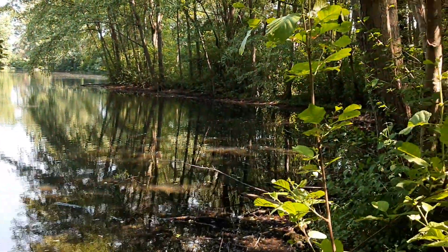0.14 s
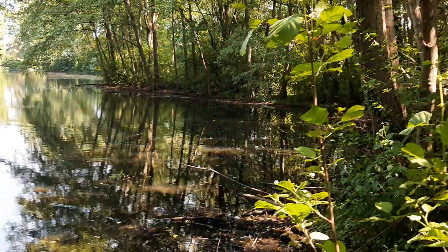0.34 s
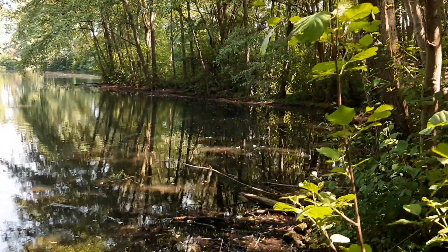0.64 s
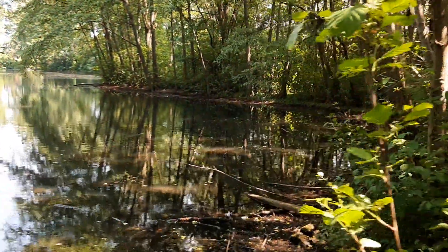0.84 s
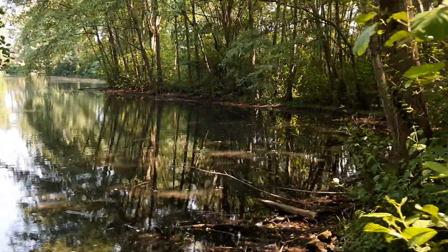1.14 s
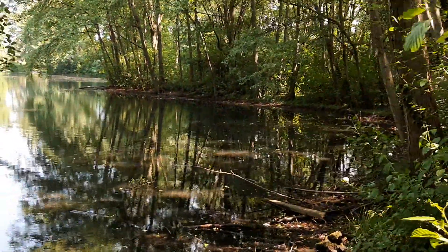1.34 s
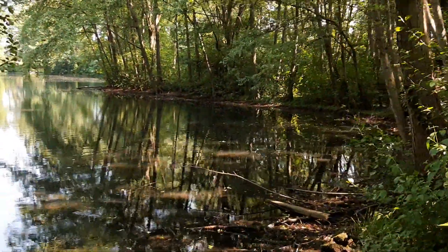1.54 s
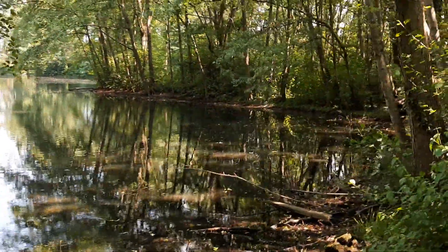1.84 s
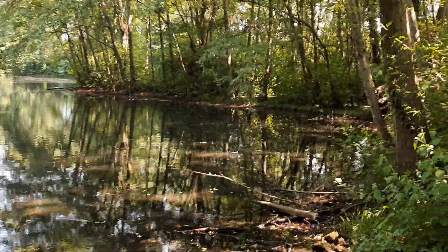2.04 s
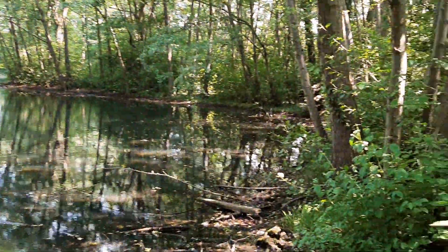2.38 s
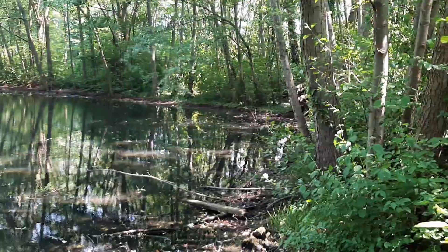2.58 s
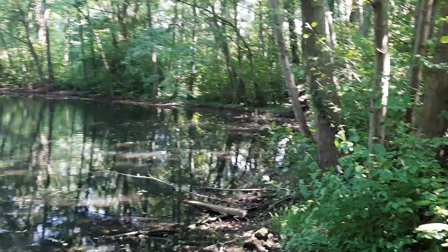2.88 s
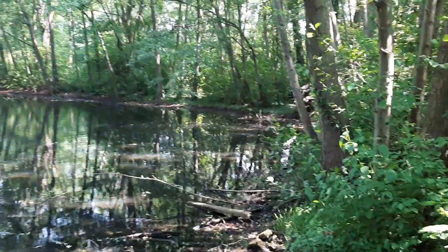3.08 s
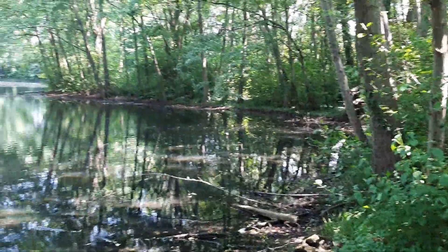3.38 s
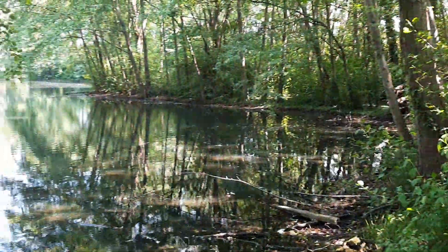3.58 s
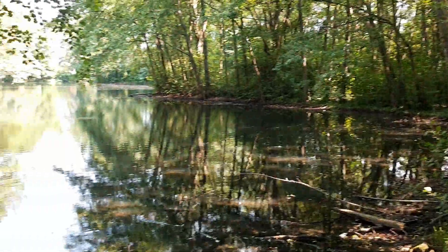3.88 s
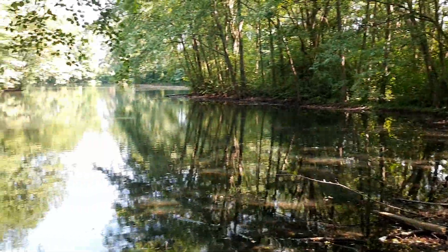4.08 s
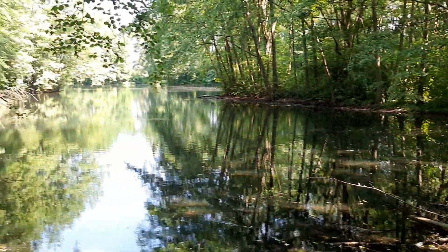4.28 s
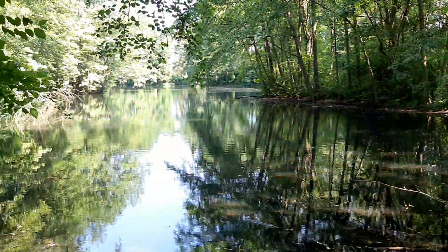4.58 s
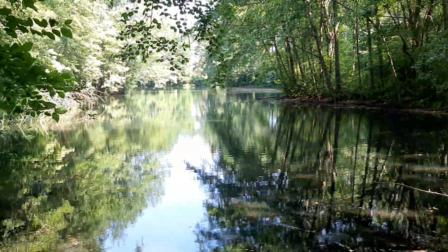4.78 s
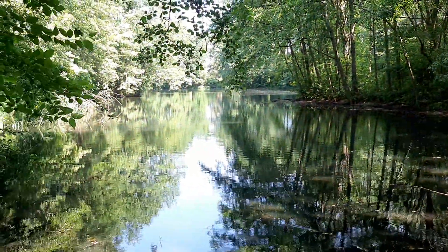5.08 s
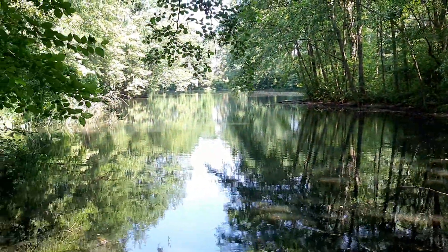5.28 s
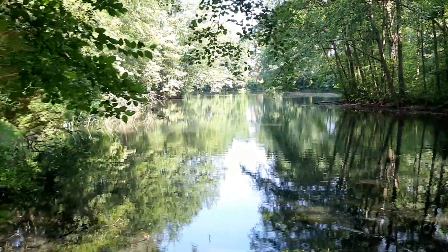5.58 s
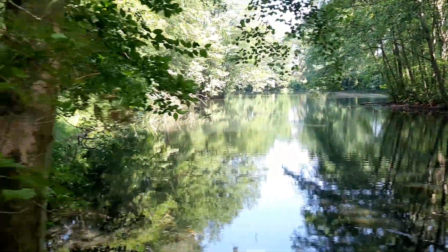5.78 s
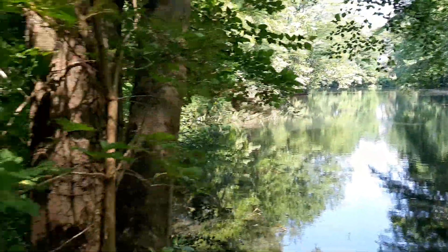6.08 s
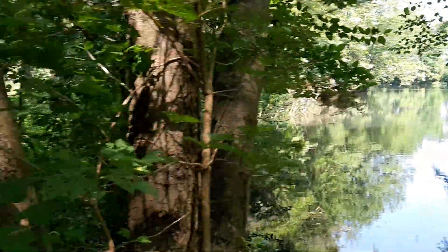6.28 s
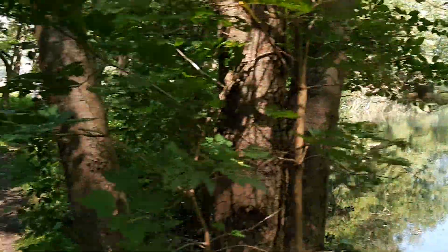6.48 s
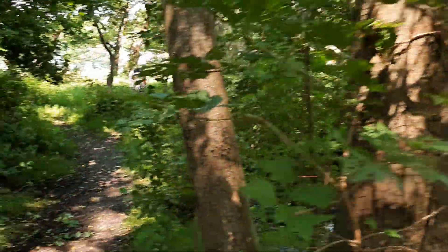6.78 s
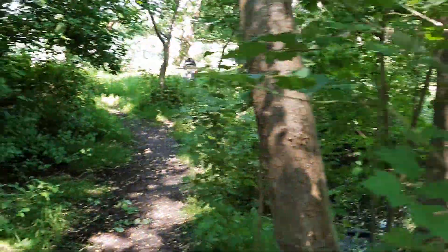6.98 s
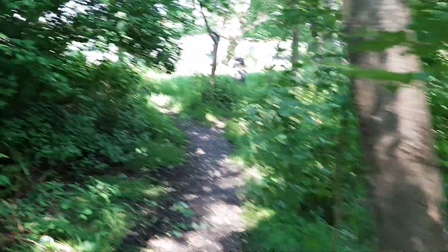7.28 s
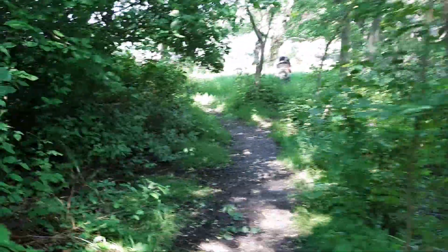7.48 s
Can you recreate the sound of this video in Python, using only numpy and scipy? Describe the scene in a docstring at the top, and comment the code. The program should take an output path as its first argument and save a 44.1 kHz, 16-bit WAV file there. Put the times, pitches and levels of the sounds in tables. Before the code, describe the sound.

A stereo microphone held by someone standing and then moving on a dirt path hears faint songbirds deep in the trees: a quick falling trill, raspy syllables, thin high calls. The birds nearly hush around three seconds, then a close warbler sings loudly and rapidly, its sharp sweeping notes echoing off trunks and water. It stops, leaving sparse calls, dull footfalls, a gritty scuff, soft air hiss and low rumble.

```python
"""A woodland pond: a near warbler bursts into a fast run of loud chirps, each a quick sweep in pitch.
Birds farther off sing, trill, buzz and whistle thinly; the trunks and the water scatter every note into
a tail, and the farthest birds are a blur of noise and random little glides.
Shaped noise makes a low far rumble and a faint leafy hiss. Feet shuffle and scuff on the dirt path
in bursts of grains, with ticking twigs and soft, ringing thuds."""
import sys
import numpy as np
from scipy import signal
from scipy.fft import rfft, irfft, next_fast_len
from scipy.io import wavfile
from scipy.ndimage import map_coordinates

SR = 44100
rng = np.random.default_rng(int(sys.argv[2]) if len(sys.argv) > 2 else 0)


def output_pcm(signal):
    """Save a mono or channel-first signal as 16-bit PCM at the path in sys.argv[1].

    Samples are clipped to [-1, 1] before scaling.
    """
    pcm = np.clip(np.atleast_2d(signal).T, -1, 1) * 32767
    wavfile.write(sys.argv[1], SR, np.round(pcm).astype(np.int16))


N = 336483


def amp(db):
    """Turns decibels into a gain."""
    return 10 ** (np.asarray(db) / 20)


def evened(x):
    """Scales a signal to an rms (average strength) of 1."""
    return x / np.sqrt(np.mean(x ** 2) + 1e-20)


def read(points, hz):
    """Reads a table of (Hz, value) between its rows, on a log-frequency axis."""
    f, value = np.transpose(points)
    return np.interp(np.log(hz + 1), np.log(f + 1), value)


def level(rows):
    """Turns a table of (seconds, dB) into a gain for every sample."""
    return amp(np.interp(np.arange(N) / SR, *np.transpose(rows)))


def add(mix, s, sound):
    """Mixes a sound in at s seconds, cutting off what runs past the end."""
    part = mix[..., max(round(s * SR), 0):][..., :sound.shape[-1]]
    part += sound[..., :part.shape[-1]]


def wander(count, hz):
    """A random curve of rms about 1 that heads for a new value hz times a second."""
    return np.interp(np.arange(count) * hz / SR, np.arange(2048), rng.standard_normal(2048))


def arc(points, count):
    """A smooth curve through evenly spaced points."""
    at = np.linspace(0, len(points) - 1, count)
    return map_coordinates(np.array(points, float), [at], order=2, mode="nearest")


def coloured(x, spectrum):
    """Filters a signal by a table of (Hz, dB), then scales it to rms 1."""
    hz = np.fft.rfftfreq(x.shape[-1], 1 / SR)
    return evened(irfft(rfft(x) * amp(read(spectrum, hz)), x.shape[-1]))


def diffuse(spectrum):
    """Noise from all around, rms 1: alike in both ears in the bass, unrelated in the high treble."""
    # Each row: frequency in Hz, likeness of the two ears (1 = same, 0 = unrelated, below 0 = opposed).
    likeness = [(30, .9), (60, .82), (130, .72), (290, .74), (640, .1), (1400, -.2), (3100, -.03),
                (15000, 0)]
    # Each row: frequency in Hz, left-over-right level in dB.
    balance = [(50, -0.3), (150, 0), (500, 0.2), (1200, -2.5), (4000, 0.3), (12000, 0)]
    size = next_fast_len(N)
    hz = np.fft.rfftfreq(size, 1 / SR)
    a, b = rfft(rng.standard_normal((2, size)))
    same = np.clip(read(likeness, hz), -1, 1)
    side = amp(read(balance, hz) / 2)
    left = a * side
    right = (same * a + np.sqrt(1 - same ** 2) * b) / side
    ears = np.array([left, right])
    return evened(irfft(ears * amp(read(spectrum, hz)), size)[:, :N])


def syrinx(hz, gain, overtone_db=-60, edge_s=.004):
    """A bird's voice box: a nearly pure tone with soft ends and three equal, weaker overtones."""
    t = np.arange(len(hz)) / SR
    phase = 2 * np.pi * np.cumsum(hz) / SR
    ends = np.sin(np.pi / 2 * np.clip(np.minimum(t, t[-1] - t) / edge_s, 0, 1)) ** 2
    # leave out overtones too high for the sample rate
    overtones = sum(np.sin(k * phase) * (k * hz < SR / 2) for k in range(2, 5))
    return np.sqrt(2) * gain * ends * (np.sin(phase) + amp(overtone_db) * overtones)


def trees(x, near_db, near_s, tail_db, gap_s=0.0015, trunks_per_s=900):
    """Near trunks and the water give a quick cluster of echoes; the deeper wood gives a long tail."""
    # Each row: frequency in Hz, time in seconds for the tail to fade by 60 dB.
    wood = [(500, 3.7), (2500, 0.37), (3500, 0.97), (5200, 0.71), (8000, 0.7), (15000, 0.3)]
    t = np.arange(SR) / SR
    # silent for one gap, then faded in over another
    after = np.clip((t - gap_s) / gap_s, 0, 1)
    hits = rng.standard_normal((2, SR)) * (rng.random((2, SR)) < trunks_per_s / SR)
    trunks = hits * after * np.exp(-t / near_s)
    # the tail is noise whose pitches fade at different speeds
    hz, age, z = signal.stft(rng.standard_normal((2, SR)) * after, SR, nperseg=256)
    faded = z * amp(-60 * age / read(wood, hz)[:, None])
    tail = signal.istft(faded, SR, nperseg=256)[1][:, :SR]
    echoes = np.zeros((2, SR))
    for db, part in [(near_db, trunks), (tail_db, tail)]:
        echoes += amp(db) * part / np.linalg.norm(part, axis=1, keepdims=True)
    return signal.fftconvolve(x, echoes, axes=1)[:, :N]


def warbler(lead_s=0.00024, overtones_db=-8, sizzle_db=-4, waver_rate=450):
    """Quick pitch strokes with an airy edge; the bird sits to the left, so that ear hears it first."""
    # The song. Each row: start in seconds, length in seconds, kind of stroke, low Hz, high Hz,
    # level in dB, airy edge in dB against the stroke (before the overtone and sizzle offsets).
    song = [(3.712, 0.069, "slur", 4750, 5550, -36, -25), (3.783, .03, "slur", 4460, 5560, -35, -19.5),
            (3.861, 0.023, "rasp", 3550, 4010, -40.5, -24), (3.885, .018, "rasp", 3334, 3750, -33.5, -27),
            (3.908, .018, "rasp", 3365, 3895, -33.5, -26), (3.947, 0.014, "slur", 4130, 5210, -43.5, -13),
            (3.956, 0.015, "fall", 7070, 7500, -42, -6), (4.051, 0.02, "rasp", 2420, 2950, -46, -19),
            (4.057, 0.018, "fall", 1990, 2860, -47.5, -25),
            (4.127, 0.067, "drop", 4340, 5510, -27.5, -23.5),
            (4.202, 0.031, "slur", 4290, 5600, -28.5, -20.5),
            (4.286, 0.023, "rasp", 3310, 4400, -36.5, -21), (4.312, 0.083, "drop", 1976, 3207, -32.5, -23),
            (4.576, 0.066, "arch", 4200, 5030, -22.5, -27.5), (4.638, 0.055, "fall", 3117, 4670, -28, -23),
            (4.745, .055, "flick", 3612, 4573, -26, -30), (4.797, 0.02, "fall", 3690, 4570, -33, -17.5),
            (4.876, 0.078, "dip", 2233, 3300, -37, -26), (5.005, .033, "flick", 2840, 3930, -34, -43.5),
            (5.032, 0.053, "fall", 3205, 3870, -29.5, -33.5),
            (5.132, 0.029, "flick", 2870, 3980, -31.5, -39.5),
            (5.158, 0.054, "fall", 3196, 3570, -29.5, -35.5), (5.237, 0.1, "arch", 2820, 3217, -30, -37),
            (5.517, 0.041, "slur", 2150, 2866, -34.5, -31), (5.55, 0.094, "arch", 2514, 3086, -29, -36),
            (5.725, 0.023, "flick", 3400, 4150, -28.5, -32), (5.747, 0.023, "fall", 2350, 4350, -36.5, -23),
            (5.767, 0.13, "scoop", 2482, 2792, -31, -27.5)]
    # Kinds of stroke. Each entry: pitch from start to end (0 = low Hz, 1 = high Hz),
    # swell from start to end in dB, waver as a share of the pitch.
    strokes = {"slur": ([0.96, 0.94, .9, 0.567, 0.047], [-7.5, -2.5, 0, -6], .009),
               "drop": ([.97, 0.99, .94, .8, 0.011], [-7, -2.5, -1, -4.5], 0.0078),
               "rasp": ([0, .45, .65, .85, .9], [-11, -2.5, -7, 4], 0.038), "flick": ([0, .15, .18, .32, 1],
               [-15, -2.5, 0, -5.5], .005), "fall": ([0.99, .46, .2, .07, 0.05], [-3.5, -0.5, -4.5, -4.5],
               0.012), "arch": ([0.028, .95, .95, .62, 0.4], [-18, 0.5, -2.5, -0.5], 0.014),
               "dip": ([0.96, .3, 0.041, .06, 0.275], [-1, -2, -5, 3.5], 0.015),
               "scoop": ([0.25, .06, 0.099, .29, 1], [-10, -1.5, -3.5, -1], 0.0048)}
    # Colour of the airy edge. Each row: frequency in Hz, relative level in dB per Hz.
    edge_colour = [(5000, -24), (7100, -13), (9000, -10), (11000, 4), (15800, 13)]
    # Side of the bird, shifting as the listener turns. Each row: time in seconds, left-over-right dB.
    sides = [(3.75, 8), (4.12, 10), (4.33, 4), (4.57, 10), (4.72, 1), (5.1, -1), (5.72, -3.5), (5.77, 8)]
    direct, voice = np.zeros((2, N)), np.zeros(N)
    sizzle = coloured(rng.standard_normal(N), edge_colour)
    for s, length, kind, low_hz, high_hz, db, edge_db in song:
        contour, swell_db, waver = strokes[kind]
        count = int(length * SR)
        hz = low_hz + (high_hz - low_hz) * arc(contour, count)
        hz = hz * (1 + waver * wander(count, waver_rate))
        gain = amp(db + arc(swell_db, count))
        note = syrinx(hz, gain, overtone_db=edge_db + overtones_db, edge_s=.0026)
        breath = signal.windows.tukey(count, .2) * sizzle[int(s * SR):][:count]
        note += amp(edge_db + sizzle_db) * gain * breath
        side_db = np.interp(s, *np.transpose(sides))
        add(voice, s, note)
        add(direct, s, note * evened(amp([[side_db / 2], [-side_db / 2]])))
    # the right ear hears it later
    direct[1] = np.roll(direct[1], round(lead_s * SR))
    return direct + trees(voice[None], near_db=-5, near_s=0.023, tail_db=-10)


def trill(start=.672, period=.0545, length=0.031, top_hz=4450, middle_hz=3550, bottom_hz=3000,
          sweep_db=-55.5, count=9):
    """A finch repeats one falling sweep, never quite alike; each sweep swells as it falls."""
    voice, size = np.zeros(N), int(length * SR)
    for k in range(count):
        hz = arc([top_hz, middle_hz, bottom_hz], size) * (1 + 0.026 * wander(size, 344))
        # each sweep's level differs by chance, about 1 dB
        gain = amp(sweep_db + rng.normal() + np.linspace(-4, 2, size))
        add(voice, start + k * period, syrinx(hz, gain, edge_s=0.0053))
    return voice


def finch(rasp_hz=90, buzz_hz=450, shake_rate=900):
    """A trill, runs of raspy syllables, then buzzes in which the pitch shakes fast and wide."""
    # Syllables, stroke by stroke. Each row: delay in seconds, length in seconds, start Hz, middle Hz,
    # end Hz, level in dB against the run.
    syllables = {"down": [(-.022, .042, 3910, 4300, 4800, -6), (.008, .034, 4360, 3650, 3100, -1),
                 (.036, .038, 2913, 3206, 2200, 0.5)], "up": [(-.008, .058, 2130, 2500, 3900, -4),
                 (.014, .038, 3224, 3320, 3080, 1)]}
    # Runs of one syllable. Each row: kind, first time in seconds, period in seconds, repeats,
    # relative level in dB.
    runs = [("down", 1.213, .181, 3, -48.5), ("up", 1.775, .14, 2, -49)]
    # Closing buzzes. Each row: start in seconds, length in seconds, start Hz, end Hz, relative level in dB.
    buzzes = [(2.239, .14, 3400, 4970, -56.5), (2.373, 0.1, 3875, 2115, -56.5),
              (2.585, 0.174, 2767, 2856, -56.5)]
    voice = trill()
    for kind, first, period, repeats, db in runs:
        for s in first + period * np.arange(round(repeats)):
            for delay, length, *pitches, stroke_db in syllables[kind]:
                count = int(length * SR)
                hz = arc(pitches, count) + rasp_hz * wander(count, shake_rate)
                add(voice, s + delay, syrinx(hz, amp(db + stroke_db), edge_s=0.016))
    for s, length, start_hz, end_hz, db in buzzes:
        count = int(length * SR)
        hz = np.linspace(start_hz, end_hz, count) + buzz_hz * wander(count, shake_rate)
        add(voice, s, syrinx(hz, amp(db), edge_s=0.0038))
    return voice


def far_song(waver_hz=12):
    """Clear, short glides from songbirds deeper in the wood."""
    # Each row: start in seconds, length in seconds, start Hz, end Hz, relative level in dB.
    notes = [(0.049, 0.048, 3940, 3885, -56.5), (0.248, 0.032, 3340, 3510, -54.5),
             (0.339, .045, 3625, 3585, -56.5), (0.399, 0.065, 2800, 2860, -53.5),
             (0.57, 0.023, 4020, 4110, -49.5), (0.619, 0.023, 2830, 2780, -49.5),
             (0.672, 0.12, 3050, 2680, -56.5), (0.943, 0.039, 2440, 2660, -57.5),
             (1.147, .068, 4050, 3650, -55.5), (1.478, 0.029, 3230, 3510, -47.5),
             (1.64, 0.067, 4860, 4710, -62), (2.098, 0.064, 3820, 3940, -55.5),
             (2.15, 0.07, 2790, 2786, -54), (2.322, 0.06, 3480, 3204, -50),
             (2.421, 0.048, 3476, 3335, -53.5), (3.073, 0.044, 3050, 3240, -61.5),
             (3.171, 0.066, 2780, 2920, -64), (3.239, 0.061, 3430, 3336, -63.5),
             (3.47, 0.04, 3190, 3010, -61.5), (3.635, 0.096, 3510, 3770, -56.5),
             (4.09, 0.081, 4200, 4230, -56), (6.122, 0.04, 3030, 2810, -56.5),
             (6.353, 0.098, 3670, 3754, -58), (6.446, .3, 3990, 4760, -73), (6.645, 0.033, 4050, 3850, -62),
             (6.946, .035, 3790, 3370, -62.5), (7.04, 0.112, 3486, 3420, -68)]
    voice = np.zeros(N)
    for s, length, start_hz, end_hz, db in notes:
        count = int(length * SR)
        hz = np.linspace(start_hz, end_hz, count) + waver_hz * wander(count, 305)
        add(voice, s, syrinx(hz, amp(db), edge_s=0.0088))
    return voice


def high_calls(scoop_hz=1100, scoop_s=0.0073, thin_db=-1):
    """Thin two-voiced falling calls in the canopy, and whistles that drop onto a held pitch."""
    # Thin calls. Each row: start in seconds, pitch in Hz, relative level in dB.
    thin_calls = [(0.143, 7700, -67), (0.279, 7480, -64), (1.033, 7280, -70), (1.068, 8400, -67),
                  (1.18, 7750, -65), (2.166, 7970, -67.5), (2.342, 7960, -66.5), (2.759, 6550, -59),
                  (2.917, 6200, -61), (3.28, 7570, -62), (3.461, 7350, -63.5), (6.274, 6950, -64.5),
                  (6.41, 6730, -68), (6.786, 7160, -75), (6.935, 7550, -71)]
    # Plain whistles. Each row: start in seconds, length in seconds, held pitch in Hz, relative level in dB.
    whistles = [(0, 0.034, 5280, -57), (0.674, 0.21, 5485, -53), (2.655, 0.16, 5430, -53.5),
                (5.389, 0.175, 5405, -53)]
    thin_s, fall_share = .083, .12
    # the second voice is lower and weaker: (share of the pitch, dB)
    voices = [(1, 0), (.86, -6)]
    voice = np.zeros(N)
    count = int(thin_s * SR)
    fall = 1 + fall_share * arc([.55, 0, -.45], count)
    for s, pitch_hz, db in thin_calls:
        for ratio, voice_db in voices:
            hz = pitch_hz * ratio * fall + 50 * wander(count, 600)
            add(voice, s, syrinx(hz, amp(db + thin_db + voice_db), edge_s=0.0036))
    for s, length, pitch_hz, db in whistles:
        t = np.arange(int(length * SR)) / SR
        hz = pitch_hz + scoop_hz * np.exp(-t / scoop_s) + 22 * wander(len(t), 124)
        add(voice, s, syrinx(hz, amp(db), edge_s=0.019))
    return voice


def feet(grains_per_s=2500, twig_s=.0012):
    """Each scuff is a swell of tiny grains; twigs tick and heels thud on soft ground."""
    # Shoes on dirt and dry leaves. Each row: start in seconds, length in seconds, level in dB,
    # lift of the bright grit in dB.
    scuffs = [(0.068, 0.12, -64, 7), (1.754, 0.068, -57.5, 2), (1.928, 0.14, -66.5, 15),
              (2.723, .14, -57.5, 3), (6.353, 0.063, -64.5, 0), (7.135, 0.25, -69, 14),
              (7.56, 0.091, -50.5, -3)]
    # Colour of crushed dirt. Each row: frequency in Hz, relative level in dB per Hz.
    dirt = [(100, -27), (600, -8), (1800, 2), (3200, -14), (5000, -11), (7500, -10.5), (12000, -11.5),
            (15800, -24)]
    # Twigs underfoot. Each row: start in seconds, relative level in dB.
    twigs = [(2.773, -38), (2.826, -48)]
    # Soft footfalls. Each row: start in seconds, level in dB, left-over-right dB.
    footfalls = [(1.939, -41.5, -23), (6.809, -28.5, 28.5), (7.069, -37, 4), (7.364, -36, 8)]
    # The ringing of a dull thud. Each row: frequency in Hz, level in dB, seconds to fade by 60 dB.
    thud_tones = [(99.4, 4.5, 0.084), (131, -6.5, 0.059), (188, -10.5, 0.11)]
    out = np.zeros((2, N))
    for s, length, db, grit_db in scuffs:
        shape = (2, int(length * SR))
        grains = rng.standard_normal(shape) * (rng.random(shape) < grains_per_s / SR)
        colour = [(hz, d + grit_db * (hz > 4000)) for hz, d in dirt]
        add(out, s, amp(db) * coloured(grains, colour) * signal.windows.tukey(shape[1], .6))
    t = np.arange(SR // 4) / SR
    for s, db in twigs:
        crackle = coloured(rng.standard_normal((2, len(t))), dirt)
        add(out, s, amp(db) * crackle * np.exp(-t / twig_s) / 2)
    thud = sum(amp(db - 60 * t / t60) * np.cos(2 * np.pi * hz * t) for hz, db, t60 in thud_tones)
    # soft ground: a slow start
    thud = thud * (1 - np.exp(-t / 0.014))
    for s, db, side_db in footfalls:
        add(out, s, thud * amp([[db + side_db / 2], [db - side_db / 2]]))
    return out


def shuffle():
    """A soft low shuffle of the feet: noise that comes and goes."""
    # Each row: frequency in Hz, relative level in dB per Hz.
    shuffle_colour = [(90, -29), (170, -6), (300, 0.5), (420, 0), (700, -25)]
    # Each row: time in seconds, level in dB.
    shuffle_level = [(3.2, -84), (3.9, -68.5), (4.35, -62.5), (4.6, -80), (6.2, -74.5), (7.1, -69.5),
                     (7.63, -61.5)]
    return level(shuffle_level) * diffuse(shuffle_colour)


def twitter(low_hz, high_hz, per_s, glide=0.11, spread_db=4):
    """Many birds too far off to tell apart: short random glides, heard only through the trees."""
    voice = np.zeros(N)
    for when, pitch, span, slope, size in rng.random((int(per_s * N / SR), 5)):
        count = int((0.0308 + .05 * span) * SR)
        middle_hz = low_hz * (high_hz / low_hz) ** pitch
        # more glides fall than rise
        hz = middle_hz * np.exp(glide * (2 * slope - 1.3) * np.linspace(-1, 1, count))
        add(voice, when * N / SR, syrinx(hz, amp(spread_db * 2 * size), edge_s=0.04))
    return evened(trees(voice[None], near_db=6, near_s=0.065, tail_db=-8.5))


def distant_chorus(blur_db=-2, low_twitter_db=-7, high_twitter_db=-8):
    """The farthest birds: a blur of noise with low and high twitter, whose level dips twice."""
    # Colour of the blur. Each row: frequency in Hz, relative level in dB per Hz.
    blur_colour = [(1500, -22), (2300, -26.5), (3200, 1), (4200, -0.5), (5200, 2), (7000, -8.5), (7800, -2),
                   (8600, -39)]
    # Level of the whole chorus. Each row: time in seconds, relative level in dB.
    chorus_level = [(0, -62.5), (.9, -58.5), (1.6, -59.5), (2.8, -62), (3.1, -86), (3.8, -59), (5.8, -59.5),
                    (6.3, -74.5), (7, -62.5), (7.63, -63.5)]
    chorus = amp(blur_db) * diffuse(blur_colour)
    chorus = chorus + amp(low_twitter_db) * twitter(2600, 4500, per_s=29)
    chorus = chorus + amp(high_twitter_db) * twitter(5700, 7500, per_s=26)
    return level(chorus_level) * chorus


def leafy_air(air_db=2):
    """The still air of the wood: a faint hiss that rises and falls as leaves stir."""
    # Each row: frequency in Hz, relative level in dB per Hz.
    air_colour = [(120, -25), (200, -13), (430, -8), (590, -2.5), (790, -5.5), (1000, -2), (1280, -5),
                  (1550, -2), (2270, -7.5), (4500, -16), (7800, -18.5), (9000, -29.5), (10800, -26),
                  (15800, -26)]
    # Each row: time in seconds, level in dB before air_db.
    breeze = [(0, -63), (.8, -60), (3.3, -60.5), (4.3, -58.5), (6.3, -59.5), (7.63, -57.5)]
    return amp(air_db) * level(breeze) * diffuse(air_colour)


def far_rumble(rumble_db=2):
    """Deep noise from far away that swells in the middle and rises again near the end."""
    # Each row: frequency in Hz, relative level in dB per Hz.
    rumble_colour = [(15, -50), (30, -28), (48, 0.5), (62, -2), (73, 3), (88, -6.5), (104, -9.5),
                     (130, -13.5), (200, -21), (300, -27), (500, -51)]
    # Each row: time in seconds, level in dB before rumble_db.
    rumble_level = [(0, -54), (2.8, -56), (3.9, -52), (5.8, -51.5), (6.4, -57), (7.3, -52.5), (7.63, -53)]
    return amp(rumble_db) * level(rumble_level) * diffuse(rumble_colour)


def scene(far_db=-3, high_db=-2):
    """Birds near and far, feet, and the steady sound of the wood."""
    far = far_song() + finch()
    high = high_calls()
    birds = warbler()
    # the direct sound of these birds is slightly louder in the right ear
    birds = birds + amp(far_db) * far * amp_free_pair(.7) + amp(high_db) * high * amp_free_pair(1)
    # their echoes do not take far_db and high_db
    birds = birds + trees(far[None], near_db=-2, near_s=0.054, tail_db=-3.5)
    birds = birds + trees(high[None], near_db=-2, near_s=0.039, tail_db=-3)
    return birds + feet() + shuffle() + distant_chorus() + leafy_air() + far_rumble()


def amp_free_pair(db):
    """Gains for the left and right ear, lowered and raised by the same number of dB."""
    return amp([[-db], [db]])


def record(dry):
    """The microphone's dip in the treble, then the recorder's band limit."""
    # Each row: frequency in Hz, gain in dB.
    microphone = [(7700, 0), (8500, -9), (9700, -5), (10500, 2)]
    edge_hz = 15850
    heard = irfft(rfft(dry) * amp(read(microphone, np.fft.rfftfreq(N, 1 / SR))), N)
    lowpass = signal.firwin(511, edge_hz, window=("kaiser", 9), fs=SR)
    return signal.oaconvolve(heard, lowpass[None], "same")


dry = scene()
out = record(dry)
output_pcm(out)
```